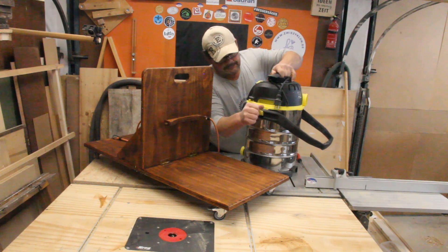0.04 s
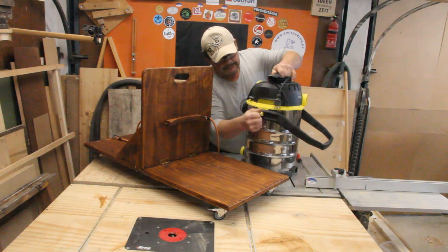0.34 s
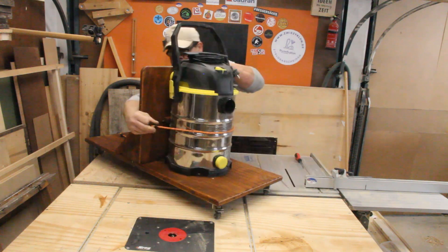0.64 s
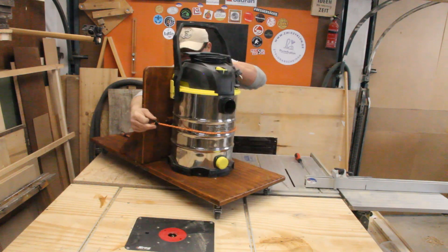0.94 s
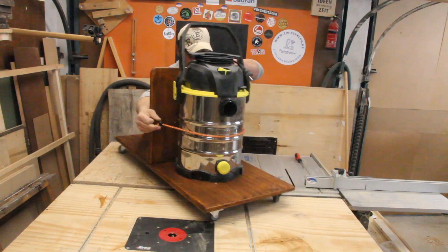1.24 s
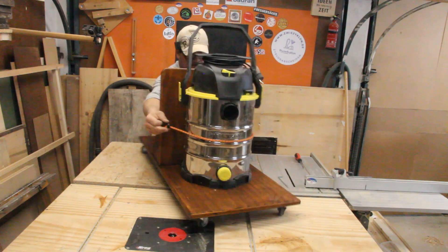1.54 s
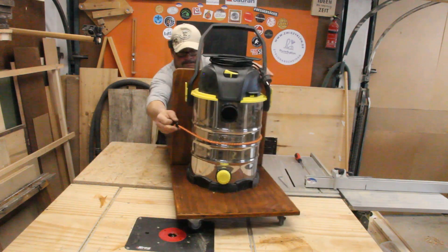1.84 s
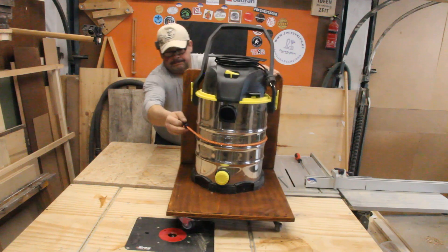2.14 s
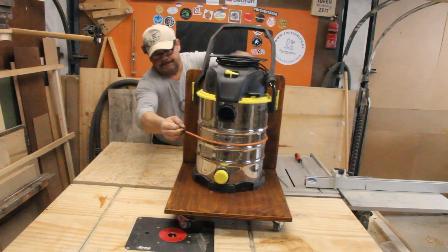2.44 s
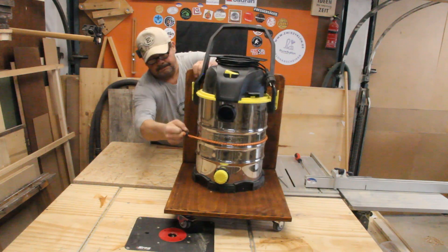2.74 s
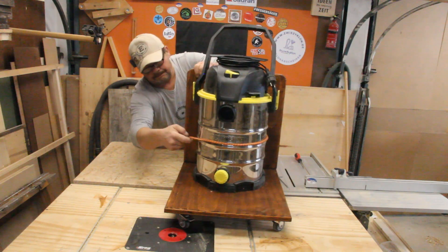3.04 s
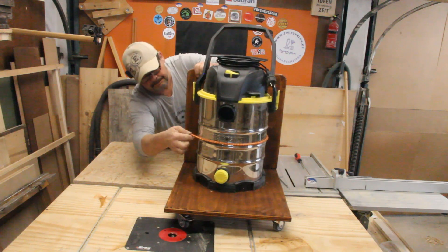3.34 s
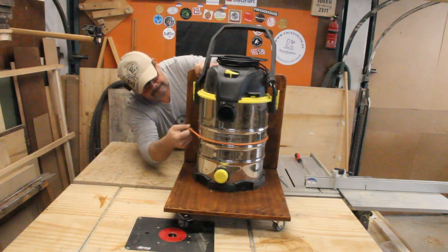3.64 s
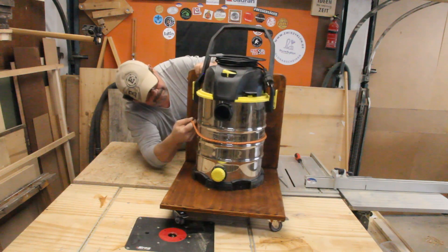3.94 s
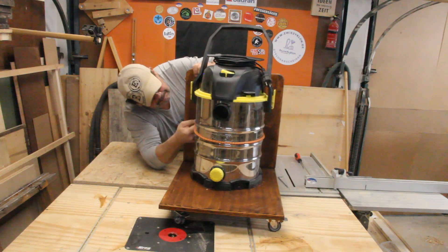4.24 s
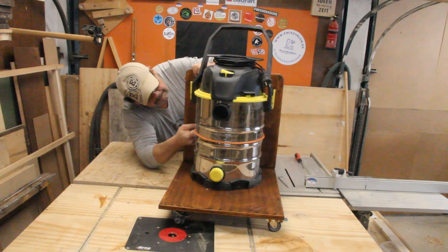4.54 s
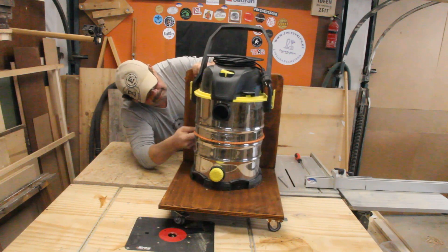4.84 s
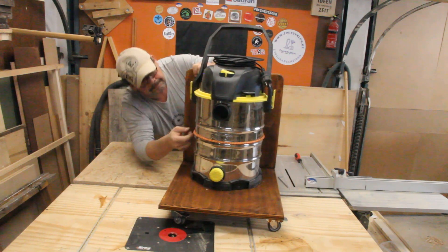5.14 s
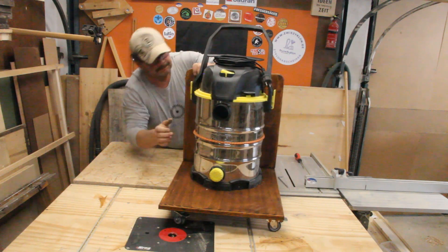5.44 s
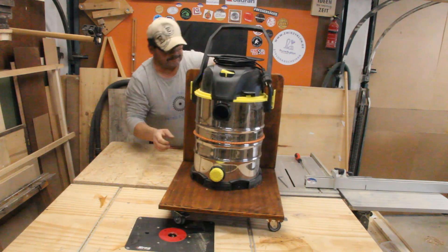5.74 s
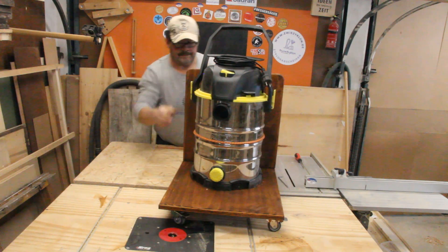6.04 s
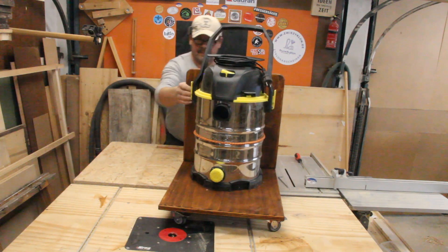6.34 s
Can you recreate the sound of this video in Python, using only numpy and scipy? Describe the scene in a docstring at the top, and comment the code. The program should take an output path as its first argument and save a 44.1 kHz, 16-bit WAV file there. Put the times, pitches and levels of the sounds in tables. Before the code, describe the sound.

A small workshop is heard from one microphone at the workbench, with a faint low drone of distant engines from about 0.6 seconds. After a few light taps, a steel drum shop vacuum lands on a wooden cart at 0.8 seconds with a loud, slightly overloaded clunk. From 1 to about 2.3 seconds the cart swings round on rumbling, rattling casters, with hollow thuds and knocks from the drum. A lull with tiny ticks follows. Near 3.9 seconds an elastic cord rubs softly and the drum and deck knock together. Between 4.5 and 5 seconds the cord's steel hook slips over wood in several jerks, each a woody knock, the later ones with a metallic ping. At 5.1 seconds the cord snaps loudly against the drum, which rings briefly. Soft rubbing follows from 6 seconds, with a light knock around 6.5.

```python
"""A small workshop, one microphone at the workbench, engines droning far off beyond the walls.
A steel drum shop vacuum clunks onto a wooden cart, which is swung round on rumbling casters.
An elastic cord rubs as it is pulled round the drum, and its steel hook slips in jerks over the
cart's wooden upright. The cord snaps home and the drum wall rings; the hardest blows overload
the microphone."""
import sys
import numpy as np
from scipy import signal
from scipy.fft import rfft, irfft, next_fast_len
from scipy.io import wavfile

SR = 44100
rng = np.random.default_rng(int(sys.argv[2]) if len(sys.argv) > 2 else 0)


def master_out(mix):
    """Clip the mix to full scale and print it as 16-bit PCM to the path in sys.argv[1]."""
    frames = np.transpose(np.atleast_2d(mix))
    ceiling = np.clip(frames, -1, 1)
    pcm = np.round(ceiling * 32767).astype(np.int16)
    wavfile.write(sys.argv[1], SR, pcm)


N = 290570
TIME = np.arange(N) / SR
AFTER = TIME[:SR]   # time since a blow [s]
BAND_HZ = 88 * 2 ** (np.arange(16) / 2)   # half-octave centres
BANDS = [signal.butter(2, [hz / 2 ** .25, hz * 2 ** .25], "band", fs=SR, output="sos") for hz in BAND_HZ]

# Levels in the tables are relative: each source applies its own gains.
# room tone: (frequency [Hz], level [dB])
AIR_COLOUR = [(15, -27), (25, -15), (38, -6.5), (52, -11), (75, -8), (100, -23), (150, -17.5), (260, -22.5),
              (450, -27), (1000, -33.5), (2500, -40), (5000, -44.5), (16000, -57)]
# loudness of the room tone: (time [s], level [dB])
AIR_LEVEL = [(0, -68.5), (.62, -60.5), (.66, -53.5), (3.5, -63.5), (5.5, -55), (6.59, -65)]
# the workshop's reverberation: (frequency [Hz], t60 [s])
ROOM_DECAY = [(100, 0.73), (300, 0.48), (800, 0.3), (3000, 0.31), (7000, 0.18), (14000, 0.26)]
# far engine: (time [s], firing rate [Hz], level [dB])
ENGINE_RUN = [(0, 60.3, -66), (.62, 62.9, -72), (.645, 66.4, -49.5), (2.15, 66.5, -48.5), (2.4, 66.13, -50),
              (3.0, 63.7, -52.5), (4.4, 63.5, -56), (4.9, 67.6, -50.5), (5.3, 63.64, -52),
              (6.59, 63.26, -56)]
# its orders, heard indoors: (multiple of the firing rate, level [dB])
ENGINE_HARMONICS = [(1, -1), (2, -25), (4, -19)]

# plastic fittings and cord tick: (time [s], level [dB], centre [Hz], t60 [s])
FITTING_TICKS = [(0.2914, -66, 6030, 0.0098), (2.331, -66.5, 3420, 0.055), (2.531, -53.5, 11880, 0.0063),
                 (2.848, -67, 9000, .11), (4.432, -69, 9660, 0.086), (4.861, -52, 2940, 0.079),
                 (5.974, -67, 6450, 0.044)]
# spectrum of a tick: (multiple of the centre, level [dB])
TICK_SHAPE = [(.1, -13), (.45, -2.5), (1, 4), (2.5, -14)]
# strokes of cord and sleeve: (start [s], length [s], level [dB], tilt [dB/octave])
RUB_STROKES = [(0.586, 0.16, -55, 0), (0.898, 0.11, -57, -1), (.985, 0.067, -46.5, -3.5),
               (1.305, 0.16, -63, 4.5), (3.426, 0.053, -70.5, 3.5), (3.81, .1, -71, 4),
               (3.904, 0.1, -64, 4), (4.282, 0.056, -76.5, 8), (4.707, .17, -63, -3),
               (6.07, 0.053, -63.5, 1.5), (6.175, 0.17, -64, -1), (6.333, 0.067, -57.5, -1),
               (6.503, 0.1, -59.5, -9)]
# their friction: (frequency [Hz], level [dB])
FRICTION_COLOUR = [(500, 8), (2500, 5.5), (5000, -3), (10000, -12.5), (15000, -20)]
# flutter as they catch: (flutter rate [Hz], level [dB])
CATCH_FLUTTER = [(5, 0), (40, 0), (400, -50)]

# pace of the cart, heard as loudness: (time [s], level [dB])
CART_PACE = [(0.85, -48), (0.948, -57), (1.196, -46), (1.272, -48.5), (1.75, -50.5), (2.128, -50),
             (2.374, -67), (2.45, -70)]
# rumble of the deck: (frequency [Hz], level [dB])
DECK_RUMBLE = [(40, -9), (80, 2.5), (155, 3), (260, -3.5), (390, -0.5), (600, -15.5), (1200, -77)]
# rattle of the bearings: (frequency [Hz], level [dB])
BEARING_GRIT = [(200, -22.5), (400, -9.5), (620, 6), (1000, -7.5), (1450, -11), (2300, -17.5), (3600, -23),
                (6000, -48), (10000, -78)]
# dull thuds of the cart deck: (time [s], level [dB], hollow resonance [Hz])
DECK_THUDS = [(0.906, -33.5, 183), (1.126, -27.5, 313), (1.18, -22, 635), (1.343, -29.5, 243),
              (1.543, -32, 158), (1.659, -28.5, 513), (1.7154, -25, 350), (1.741, -30, 1320),
              (2.024, -39, 688), (2.079, -32.5, 613), (3.949, -27, 352), (4.072, -43, 157)]
# spectrum of a thud: (frequency [Hz], level [dB])
DECK_THUD_COLOUR = [(60, -19.5), (200, -2), (800, -13.5), (2500, -30), (9000, -83), (16000, -60)]

# drum and fittings on the cart: (time [s], level [dB], brightness [Hz], hollow resonance [Hz], t60 [s])
DRUM_KNOCKS = [(.442, -52.5, 2200, 392, 0.13), (0.506, -49.5, 1250, 466, 0.2),
               (.642, -47.5, 6200, 2300, 0.45), (.756, -17, 2250, 1480, 0.11),
               (.764, -22, 1200, 840, 0.076), (.779, -30, 2200, 235, 0.13), (0.814, -29, 1390, 354, 0.14),
               (1.102, -35, 2440, 2060, 0.18), (1.545, -42.5, 2010, 510, 0.057),
               (1.625, -40.5, 1722, 1188, .08), (1.715, -35, 1100, 596, 0.046),
               (1.769, -39, 2240, 1950, 0.15), (1.865, -34.5, 2200, 1470, 0.045),
               (1.891, -36, 1600, 790, 0.056), (1.9404, -31, 2400, 1480, 0.059),
               (2.0017, -24.5, 2940, 850, 0.04), (2.123, -35, 1400, 393, 0.074),
               (2.772, -60, 3500, 710, 0.26), (3.913, -29, 1610, 635, .05), (3.951, -28, 1210, 400, 0.067),
               (3.959, -33.5, 890, 635, 0.078), (6.441, -47, 1500, 700, 0.071),
               (6.463, -37, 2020, 750, 0.028)]
# a perfectly hard contact: (frequency [Hz], level [dB])
HARD_CONTACT = [(60, -22), (200, -7), (800, -1.5), (2500, 0), (4000, 2.5), (6500, -10.5), (16000, -1)]
# heavy loads on the deck: (time [s], level [dB], brightness [Hz])
DECK_LOADS = [(.757, -29.5, 3914), (3.95, -38, 600)]
# cart deck: (frequency [Hz], level [dB], t60 [s])
DECK_MODES = [(122.7, -14.5, 0.21), (175.4, -9.5, 0.43), (245.6, -9, 0.6), (354, -6, 0.25),
              (396, -11, 0.74), (432, -10, 0.15), (489.6, 2.5, 0.11), (650, -1, 0.31), (1041, -5.5, 0.13),
              (1534, -9, 0.14), (1560, -5, 0.15)]

# the hook slips and catches: (time [s], wood ring [dB], brightness [Hz], knock [dB], hook ping [dB])
HOOK_SLIPS = [(4.479, -36.5, 790, -49, -71), (4.6, -39.5, 1100, -49.5, -54),
              (4.761, -36.5, 2250, -45.5, -29), (4.877, -31, 1720, -37.5, -20),
              (5.033, -52, 1460, -39, -36)]
# wooden upright: (frequency [Hz], level [dB], t60 [s])
UPRIGHT_MODES = [(515, -0.5, 0.25), (656.5, -2, 0.15), (807, -19, 0.073), (1027, -23, .14),
                 (1028, -32, 0.11), (1180, -50, 0.14), (1440, -30, 0.38), (1583, -19, 0.32),
                 (1796, -8.5, 0.1), (1960, -38, 0.17), (2130, -20, 0.076)]
# a knock on the upright: (frequency [Hz], level [dB])
UPRIGHT_KNOCK = [(100, -38), (300, -8.5), (600, 2), (1800, -18), (2600, -11), (4000, -29), (8000, -26),
                 (15000, -40)]
# the crack that excites the hook: (frequency [Hz], level [dB])
HOOK_CRACK = [(100, -30), (1000, -6), (15000, -1)]
# steel hook, damped by the cord: (frequency [Hz], width [Hz], level [dB])
HOOK_MODES = [(1093, 330, 6), (2010, 270, 3.5), (3320, 320, 1), (3740, 330, 0), (5280, 580, -1),
              (6520, 240, -4), (7150, 400, -4), (8630, 300, -8), (9400, 250, -11), (10500, 730, -4),
              (11000, 310, 0), (13300, 500, -11), (14400, 1500, -21)]
# the cord snaps home and rebounds: (time [s], level [dB])
CORD_SLAPS = [(5.0705, -15), (5.085, -24)]
# spectrum of a slap: (frequency [Hz], level [dB])
SLAP_COLOUR = [(80, -41), (200, -23), (450, 0), (900, 1.5), (1500, -5), (3000, -0.5), (6000, -2),
               (11000, -7.5), (15000, -32)]
# steel drum wall under the cord: (frequency [Hz], level [dB], t60 [s])
DRUM_MODES = [(398, -36, 2.2), (463, -3, 0.22), (485.4, 3.5, 0.19), (532, -15.5, 0.59), (685, -28, 0.99),
              (710, -15, 0.28), (796, -24, 0.53), (944, -45.5, 2.16), (973, -38, 0.95), (1035, 0.5, 0.11),
              (1170, -30.5, 0.56), (1295, -21.5, 0.3), (1420, -25, 0.34), (1600, -39, 0.23),
              (1746, -27, 0.35), (2046, -29, 0.62), (1980, -37, 0.45), (2245, -29.5, 0.51),
              (2650, -33, 0.073), (2866, -5, 0.079), (2700, -18, 0.27), (3040, -29, 0.44),
              (3200, -28.5, 0.44), (3210, -18, 0.15), (4000, -39, 0.6), (5250, -29, 0.17)]


def amp(db):
    """Decibels to gain."""
    return 10 ** (np.asarray(db) / 20)


def unit(x):
    """Scale to rms 1."""
    return x / np.sqrt(np.mean(x ** 2) + 1e-20)


def in_time(rows):
    """Each column of a curve, at every sample."""
    times, *columns = np.transpose(rows)
    return [np.interp(TIME, times, column) for column in columns]


def at_hz(points, hz):
    """Read a table on a log-frequency axis."""
    frequencies, values = np.transpose(points)
    return np.interp(np.log(np.maximum(hz, 1)), np.log(frequencies), values)


def coloured(x, spectrum):
    """Give a steady sound a spectrum; rms 1."""
    size = next_fast_len(N)
    gain = amp(at_hz(spectrum, np.fft.rfftfreq(size, 1 / SR)))
    return unit(irfft(rfft(x, size) * gain, size)[:N])


def dying(t60):
    """Exponential decay after a blow."""
    return np.exp(-np.log(1000) * AFTER / max(t60, 1e-3)) + 1e-12


def swell(start_s, length_s, attack_s, release_s):
    """Rise, hold until the length is over, then fade."""
    rise = np.clip((TIME - start_s) / attack_s, 0, 1)
    return rise * np.clip(1 - (TIME - start_s - length_s) / release_s, 0, 1) ** 2


def add(track, s, sound):
    """Mix a sound in at time s."""
    start = max(round(s * SR), 0)
    track[start:start + len(sound)] += sound[:N - start]


def resonate(x, hz, width_hz):
    """One resonance, gain 1 at its top."""
    return signal.lfilter(*signal.iirpeak(hz, hz / width_hz, fs=SR), x)


def hollow(blow, hz, boost_db, sharpness):
    """The struck part adds a broad resonance of its own."""
    return blow + amp(boost_db) * resonate(blow, hz, hz / sharpness)


def burst(colour, t60, room_db):
    """Crowded modes of a blow: half-octave noise that dies fast, lows last, then the room's tail."""
    out, white = np.zeros(SR), rng.standard_normal((2, SR))
    for k, (hz, band) in enumerate(zip(BAND_HZ, BANDS)):
        direct = dying(t60 * (1000 / hz) ** 0.25)   # t60 holds at 1 kHz
        room = amp(room_db) * dying(at_hz(ROOM_DECAY, hz))
        envelope = np.hypot(direct, room)
        part = signal.sosfilt(band, white[k % 2] * envelope)
        out += amp(at_hz(colour, hz)) * unit(part) * np.sqrt(np.mean(envelope ** 2))
    return out


def ring(modes, bright_hz, scatter_db, diffuse, reflections_s=0.0038):
    """Struck modes; a soft contact misses the high ones, and as reflections arrive each one wavers."""
    out = np.zeros(SR)
    arrived = 1 - np.exp(-(AFTER / reflections_s) ** 2)
    for hz, db, t60 in modes:
        strength = amp(db + scatter_db * rng.standard_normal()) / np.hypot(1, hz / bright_hz)
        knots = rng.standard_normal((2, 100))
        real, imag = (np.interp(AFTER, np.linspace(0, 1, len(k)), k) for k in knots)
        waver = 1 + diffuse * arrived * (real + 1j * imag)
        swing = waver * np.exp(2j * np.pi * hz * AFTER)
        out += rng.choice([-1, 1]) * strength * dying(t60) * swing.imag
    return out * np.minimum(1, 10 * (1 - AFTER))   # fade over the last 0.1 s


def room_tone():
    """The workshop's air: low noise that steps up at 0.64 s, as the hum enters, then varies slowly."""
    return amp(in_time(AIR_LEVEL)[0]) * coloured(rng.standard_normal(N), AIR_COLOUR)


def far_engines(deep_hz=42, deep_db=-55.5):
    """Far outside: only the lowest engine orders pass the walls; a deeper drone swells and fades."""
    firing_hz, db = in_time(ENGINE_RUN)
    phase = 2 * np.pi * np.cumsum(firing_hz) / SR
    engine = sum(amp(db + order_db) * np.sin(order * phase) for order, order_db in ENGINE_HARMONICS)
    deep_level = amp(deep_db) * swell(2.52, 1.42, attack_s=0.38, release_s=0.66)
    return engine + deep_level * np.sin(2 * np.pi * deep_hz * TIME)


def fitting_ticks():
    """Light, dry touches of the fittings, each in a range of its own."""
    out = np.zeros(N)
    for s, db, centre_hz, t60 in FITTING_TICKS:
        colour = [(multiple * centre_hz, db + level_db) for multiple, level_db in TICK_SHAPE]
        add(out, s, burst(colour, t60, room_db=-16))
    return out


def rubbing(catch_db=2.0):
    """Braided cord and cloth slide over steel and wood in short strokes, catching unevenly."""
    catching = coloured(rng.standard_normal(N), CATCH_FLUTTER)
    friction, out = rng.standard_normal(N), np.zeros(N)
    for s, length_s, db, tilt in RUB_STROKES:
        colour = [(hz, level_db + tilt * np.log2(hz)) for hz, level_db in FRICTION_COLOUR]
        out += amp(db) * swell(s, length_s, attack_s=.03, release_s=.05) * coloured(friction, colour)
    return amp(catch_db * catching) * out


def casters(bumps_per_s=900, spread_db=3, rumble_db=2, grit_db=-4.5, swivel_db=12, room_db=-21):
    """Wheels meet many small bumps: the deck rumbles and the bearings rattle, both following the pace."""
    pace = amp(in_time(CART_PACE)[0]) * swell(.8, 1.66, attack_s=0.072, release_s=0.64)
    sizes = amp(spread_db * np.minimum(rng.exponential(1, N), 3)) * rng.choice([-1, 1], N)
    bumps = sizes * (rng.random(N) < bumps_per_s / SR)
    rumble = amp(rumble_db) * coloured(bumps, DECK_RUMBLE)
    one_rattle = rng.standard_normal(SR) * (dying(t60=0.022) + amp(room_db) * dying(t60=0.97))
    rattle = signal.fftconvolve(bumps, one_rattle)[:N]
    # the casters grind harder while they turn into line
    swivel = swell(1.121, 0.13, attack_s=0.045, release_s=0.11)
    grit = amp(grit_db + swivel_db * swivel) * coloured(rattle, BEARING_GRIT)
    return pace * (rumble + grit)


def deck_thuds(gain_db=-8):
    """Dull, hollow thuds of the cart deck, while it rolls and under later knocks."""
    out = np.zeros(N)
    for s, db, hollow_hz in DECK_THUDS:
        blow = burst(DECK_THUD_COLOUR, t60=.055, room_db=-8)
        add(out, s, amp(db + gain_db) * hollow(blow, hollow_hz, boost_db=7.5, sharpness=11.4))
    return out


def drum_knocks(gain_db=-8, loss_db_per_octave=16.5):
    """The drum lands and rocks; softer contacts are duller, and heavy ones set the deck ringing."""
    out = np.zeros(N)
    for s, db, bright_hz, hollow_hz, t60 in DRUM_KNOCKS:
        octaves_above = np.log2(1 + (BAND_HZ / bright_hz) ** 4) / 4   # soft knee at the brightness
        band_db = at_hz(HARD_CONTACT, BAND_HZ) - loss_db_per_octave * octaves_above
        blow = burst(list(zip(BAND_HZ, band_db)), t60, room_db=-12.5)
        add(out, s, amp(db + gain_db) * hollow(blow, hollow_hz, boost_db=5.5, sharpness=7))
    for s, db, bright_hz in DECK_LOADS:
        add(out, s, amp(db) * ring(DECK_MODES, bright_hz, scatter_db=3, diffuse=0.2))
    return out


def hook_slips():
    """The tightening cord jerks the hook along: at each catch the wood rings and the steel pings."""
    out = np.zeros(N)
    for s, ring_db, bright_hz, knock_db, ping_db in HOOK_SLIPS:
        add(out, s, amp(ring_db) * ring(UPRIGHT_MODES, bright_hz, scatter_db=2.5, diffuse=0.81))
        add(out, s, amp(knock_db) * burst(UPRIGHT_KNOCK, t60=0.15, room_db=-6))
        crack = amp(ping_db) * burst(HOOK_CRACK, t60=0.016, room_db=-19)
        for hz, width_hz, db in HOOK_MODES:
            add(out, s, amp(db) * resonate(resonate(crack, hz, width_hz), hz, width_hz))
    return out


def cord_snap(ring_db=-14):
    """The cord slaps the drum and rebounds; the steel wall rings on from the first slap."""
    out = np.zeros(N)
    for s, db in CORD_SLAPS:
        add(out, s, amp(db) * burst(SLAP_COLOUR, t60=0.057, room_db=-17))
    wall = ring(DRUM_MODES, bright_hz=9250, scatter_db=1.5, diffuse=0.5)
    add(out, CORD_SLAPS[0][0], amp(ring_db) * wall)
    return out


def scene(hiss_db=-76.5):
    """All sources reach one microphone; each of the two channels has its own trace of hiss."""
    blows = drum_knocks() + deck_thuds() + fitting_ticks() + hook_slips() + cord_snap()
    mono = blows + casters() + rubbing() + room_tone() + far_engines()
    return mono + amp(hiss_db) * rng.standard_normal((2, N))


def record(dry, ceiling=.104, cutoff_hz=15750):
    """Hard blows overload the microphone and are flattened; the top of the treble is cut."""
    clipped = dry / (1 + (dry / ceiling) ** 6) ** (1 / 6)
    lowpass = signal.firwin(255, cutoff_hz, fs=SR)
    return signal.fftconvolve(clipped, lowpass[None], "same")


dry = scene()
out = record(dry)
master_out(out)
```